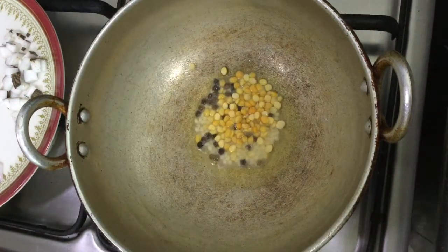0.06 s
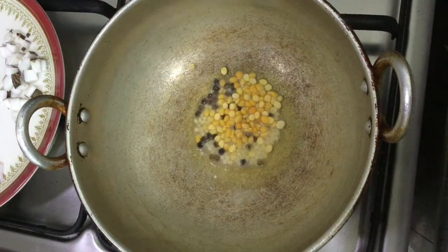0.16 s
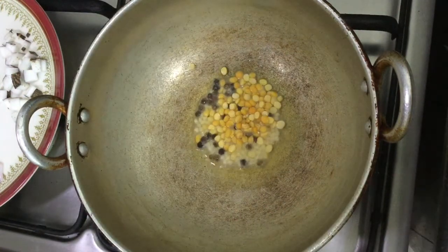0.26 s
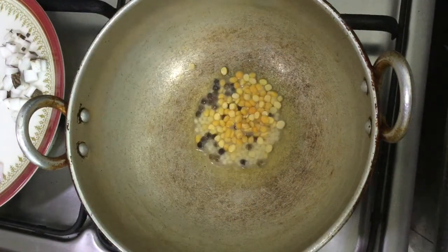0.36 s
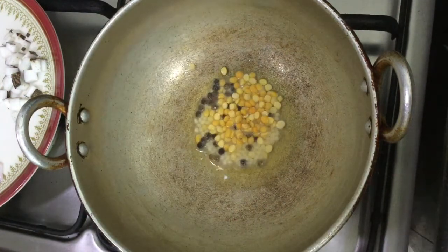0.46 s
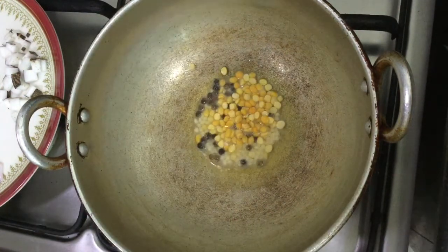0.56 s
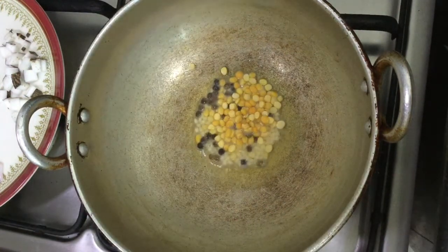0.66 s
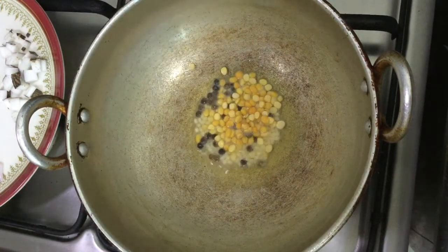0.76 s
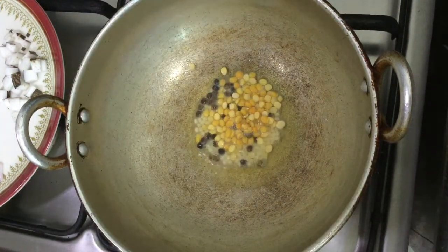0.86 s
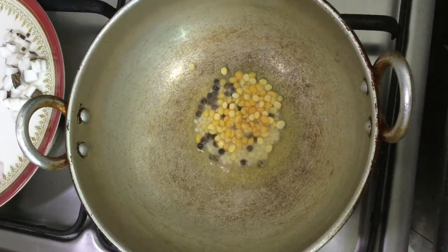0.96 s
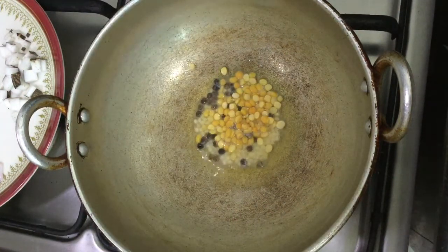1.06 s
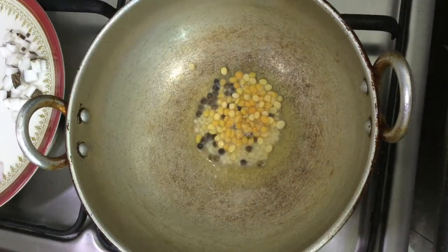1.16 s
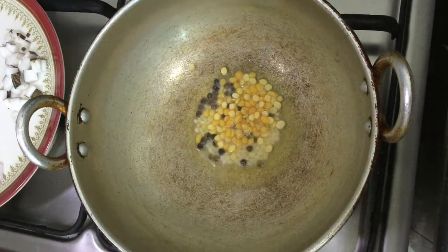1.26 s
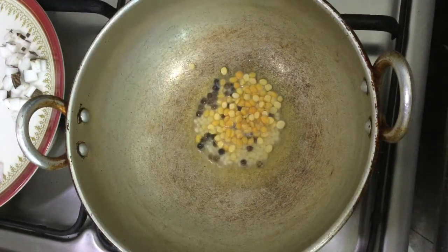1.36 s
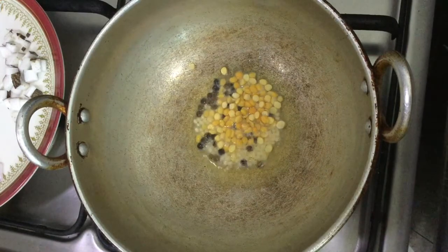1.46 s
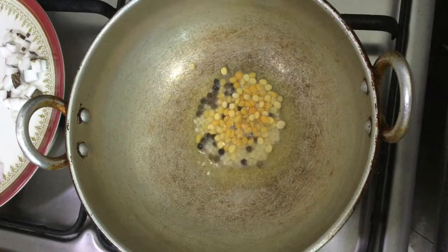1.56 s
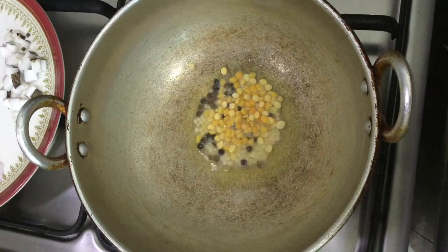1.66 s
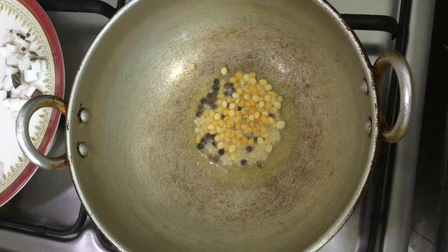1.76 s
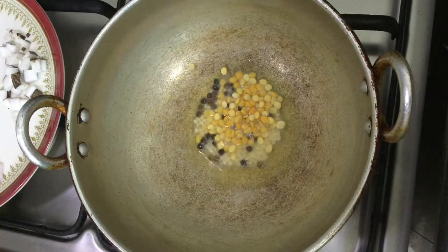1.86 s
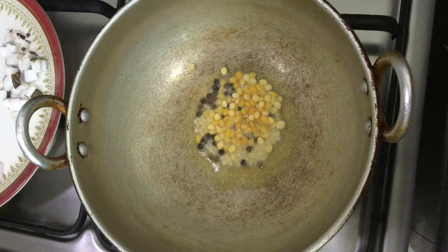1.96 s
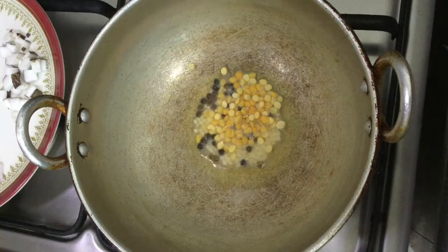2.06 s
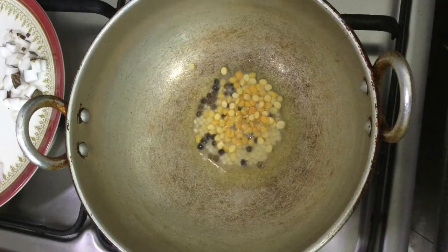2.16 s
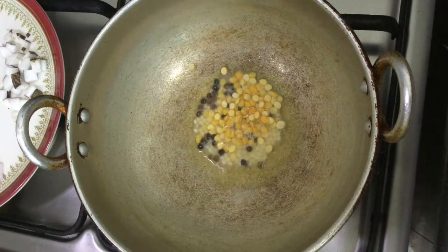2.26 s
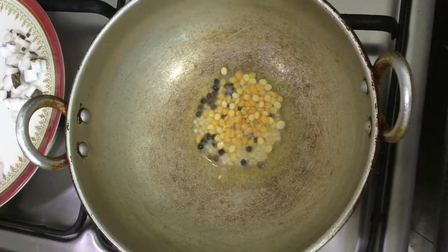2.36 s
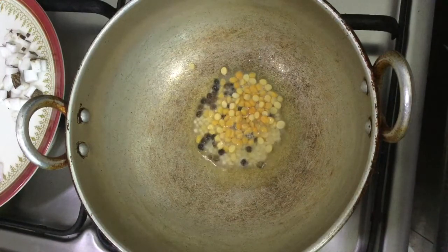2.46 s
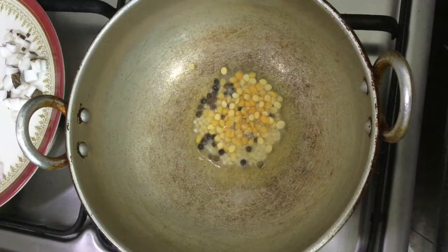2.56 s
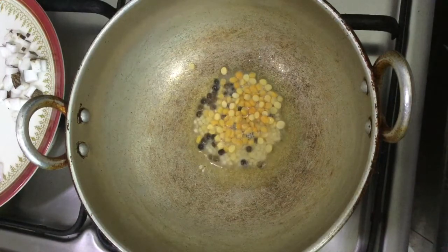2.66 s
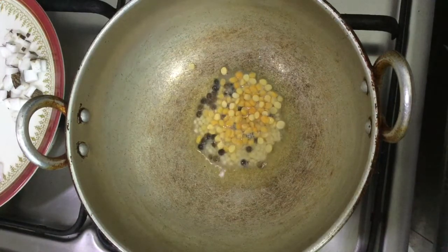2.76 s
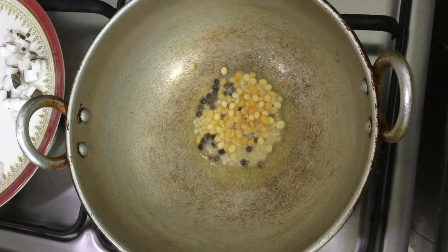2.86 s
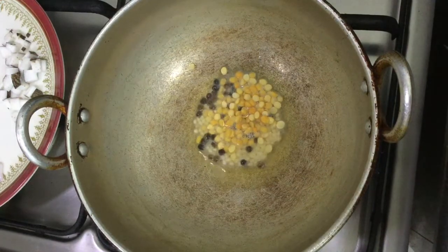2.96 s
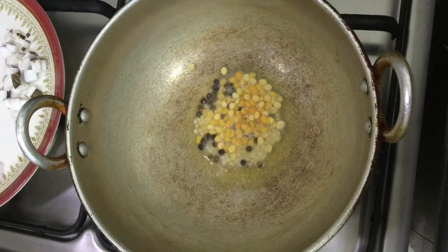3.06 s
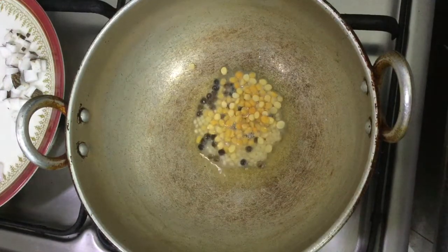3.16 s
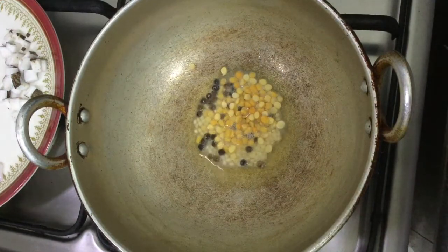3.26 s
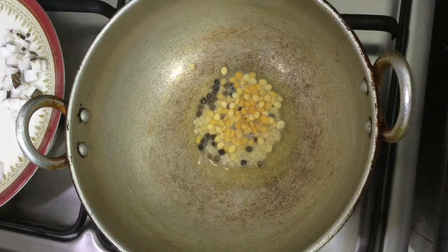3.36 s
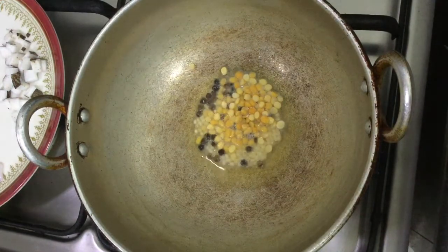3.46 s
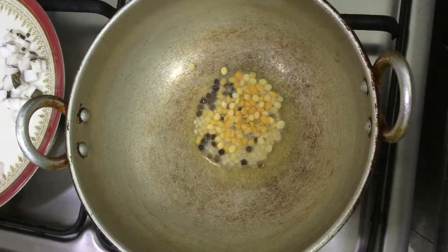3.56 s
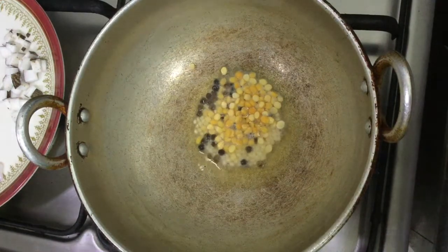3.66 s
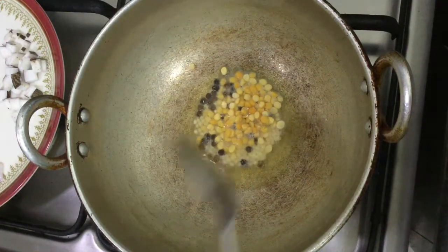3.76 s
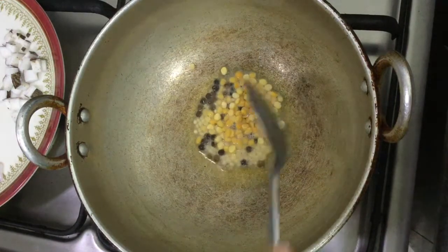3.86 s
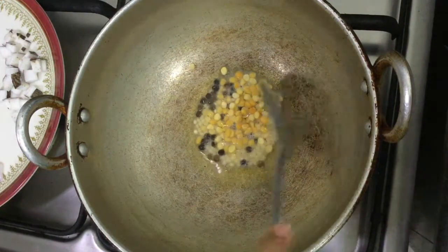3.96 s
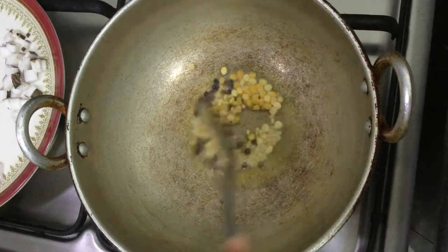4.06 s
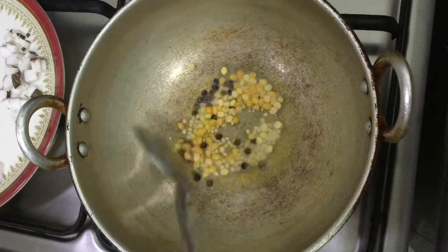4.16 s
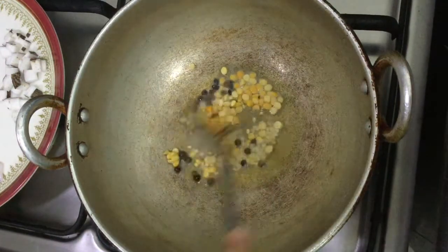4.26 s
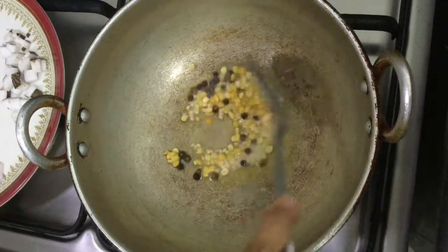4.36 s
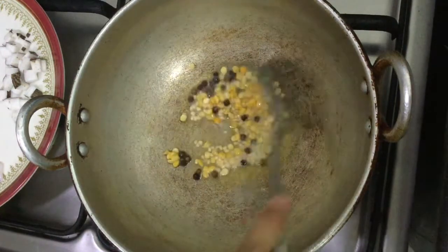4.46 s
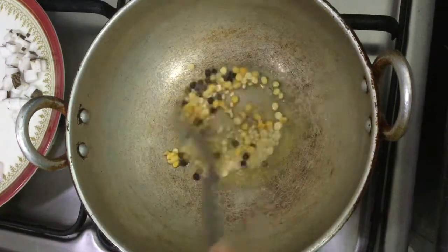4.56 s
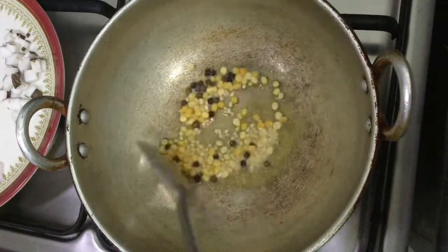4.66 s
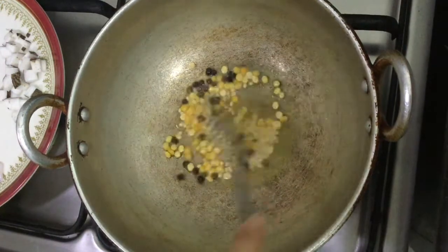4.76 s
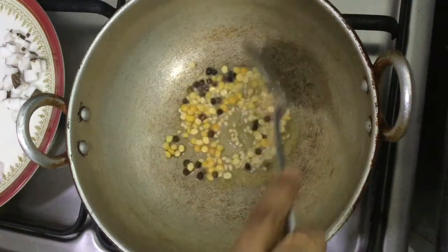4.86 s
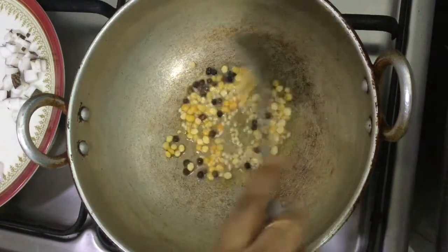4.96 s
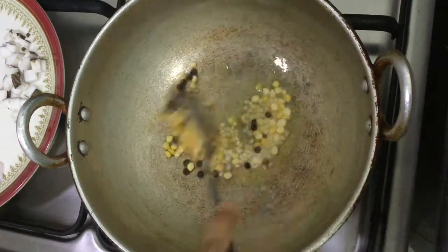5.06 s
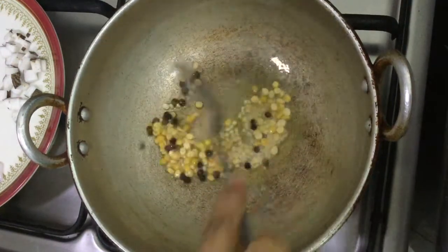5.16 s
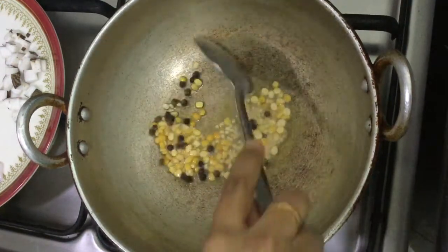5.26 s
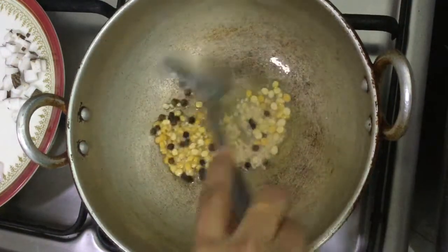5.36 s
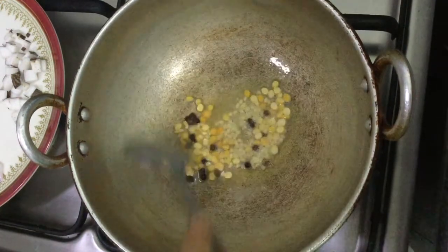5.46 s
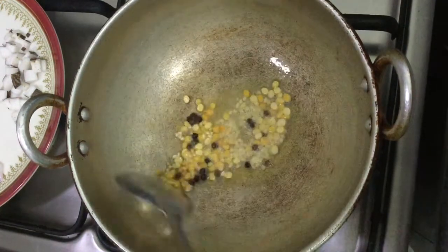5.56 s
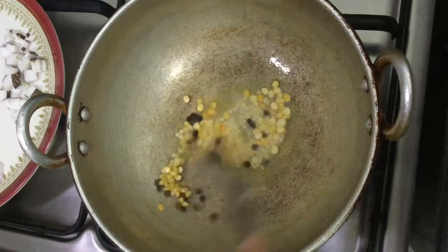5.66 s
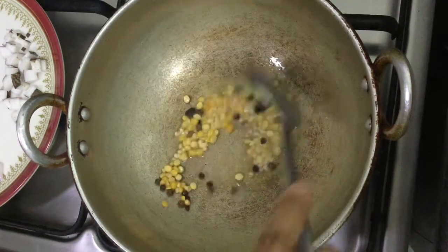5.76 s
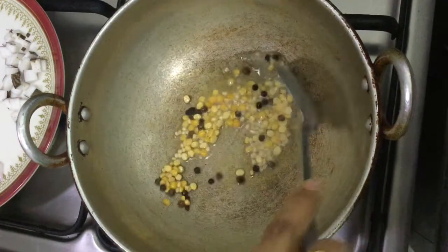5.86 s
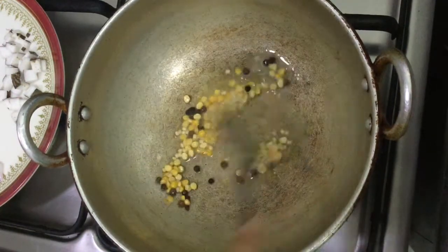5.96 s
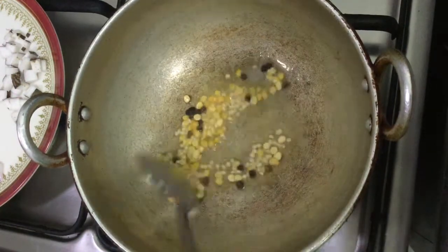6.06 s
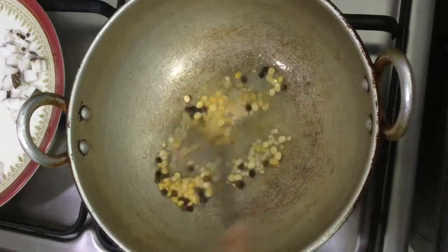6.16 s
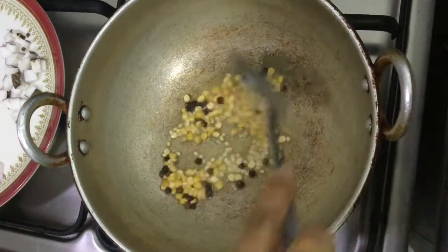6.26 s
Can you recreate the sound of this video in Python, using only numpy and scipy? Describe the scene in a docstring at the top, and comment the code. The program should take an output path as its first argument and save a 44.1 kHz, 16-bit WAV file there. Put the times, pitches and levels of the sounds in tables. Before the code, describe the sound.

Hot oil fizzes and pops with lentils in a metal pan, then a steel spoon rings and stirs with knocks, scrapes and rising sizzle.

```python
"""Hot oil fizzes and crackles over a low rumble and hum, with loud pops and squeaks of steam.
Lentils and peppercorns are frying in a thin metal pan on a stove, close to the microphone.
A steel spoon is picked up with a ringing slide, then stirs: it knocks and scrapes the pan,
the lentils rattle and the turned oil sizzles up. Fizz, sizzle, steam and scrapes are shaped noise and
clicks; metal is a set of dying tones; pops and bumps are short pings."""
import sys
import numpy as np
from scipy import signal
from scipy.fft import rfft, irfft
from scipy.io import wavfile

SR = 44100
rng = np.random.default_rng(int(sys.argv[2]) if len(sys.argv) > 2 else 0)


def log_audio(samples):
    """Write samples as a 16-bit WAV file to the path given in sys.argv[1]."""
    # one column per channel
    frames = np.atleast_2d(samples).T
    # limit to full scale, then quantise
    limited = np.clip(frames, -1, 1)
    pcm = np.round(limited * 32767).astype(np.int16)
    wavfile.write(sys.argv[1], SR, pcm)


N = 277830
TIME = np.arange(N) / SR  # seconds
EDGE_HZ = 15900  # top of the audible band


def gain_of(db):
    """Turns decibels into an amplitude."""
    return 10 ** (np.asarray(db) / 20)


def evened(x):
    """Scales a sound to rms 1."""
    return x / np.sqrt(np.mean(x ** 2) + 1e-20)


def read(points, hz):
    """Reads a table of values by frequency, with straight lines between points on a log-frequency axis."""
    f, value = np.transpose(points)
    return np.interp(np.log(hz + 1), np.log(f + 1), value)


def level(rows):
    """Turns a dB curve over time into a gain, silent before its first row."""
    return gain_of(np.interp(TIME, *np.transpose(rows), left=-200))


def add(mix, s, sound):
    """Mixes a sound in at time s."""
    part = mix[max(round(s * SR), 0):][:len(sound)]
    part += sound[:len(part)]


def coloured(x, points):
    """Filters x with a spectrum and scales it to rms 1."""
    hz = np.fft.rfftfreq(len(x), 1 / SR)
    return evened(irfft(rfft(x) * gain_of(read(points, hz)), len(x)))


def wander(rate_hz):
    """Random drift of rms 1, slow because noise above rate_hz is filtered away."""
    hz = np.fft.rfftfreq(N, 1 / SR)
    slow = rfft(rng.standard_normal(N)) / (1 + (hz / rate_hz) ** 4)
    return evened(irfft(slow, N))


def clicks(per_s, spread_db):
    """Single-sample clicks at random times: many small, a few large."""
    size = gain_of(spread_db * np.minimum(rng.exponential(1, N), 3.5))
    sign = rng.choice([-1, 1], N)
    return size * sign * (rng.random(N) < per_s / SR)


def ring(modes, damping):
    """Struck metal sounds as a sum of tones (modes), each dying at its own rate."""
    t = TIME[:SR // 2]
    total = np.zeros(len(t))
    for hz, db, t60 in modes:
        fade = gain_of(db - 60 * damping * t / t60)
        total += fade * np.sin(2 * np.pi * (hz * t + rng.random()))
    return total


def ping(hz, cycles, glide, size=SR // 40):
    """A few dying cycles whose pitch glides away from hz by the fraction glide."""
    age = TIME[:size] * hz / cycles
    turns = cycles * (age + glide * (age - 1 + np.exp(-age)))
    return (1 - np.exp(-6 * age)) * np.exp(-age) * np.sin(2 * np.pi * turns)


def grains(low_hz, high_hz, per_s, spread_db, cycles, count=40):
    """A crowd of tiny pings of many pitches, set off by random clicks."""
    out = np.zeros(N)
    for hz in np.geomspace(low_hz, high_hz, count):
        grain = evened(ping(hz, cycles * rng.uniform(.5, 2), 0.0068))
        out += signal.oaconvolve(clicks(per_s / count, spread_db), grain)[:N] * np.sqrt(hz)
    return evened(out)


def gesture(start, rise, length, fall_db_per_s):
    """Rises, holds to the end of its length, then dies away."""
    age = TIME - start
    return np.clip(age / rise, 0, 1) * gain_of(-fall_db_per_s * np.maximum(age - length, 0))


# The pan's wall throws the crackle back. Each row: delay in ms, gain.
WALL = [(1.599, -0.075), (2.7, 0.013)]


def walled(x):
    """Quick echoes inside the pan make the crackle a little hollow."""
    echoes = sum(gain * np.interp(TIME - ms / 1000, TIME, x) for ms, gain in WALL)
    return evened(x + echoes)


# How long the room echo lasts. Each row: frequency in Hz, time in seconds to fall by 60 dB.
KITCHEN = [(200, 0.53), (1000, 0.22), (5000, 0.21), (15000, 0.16)]


def kitchen(x):
    """Dense reflections of a small room, made of fading noise; the treble dies first."""
    hz, t, z = signal.stft(rng.standard_normal(SR // 2), SR, nperseg=256)
    fade = gain_of(-60 * t / read(KITCHEN, hz)[:, None])
    tail = signal.istft(z * fade, SR, nperseg=256)[1]
    tail[:SR // 250] = 0  # no reflection in the first 4 ms
    return signal.oaconvolve(x, tail / np.linalg.norm(tail))[:N]


# Spectrum of the steady oil fizz and kitchen background. Each row: frequency in Hz, level in dB per Hz.
FIZZ_SPECTRUM = [(150, -34), (250, -10), (510, -2), (586, -5.5), (906, -16), (1040, -9), (1350, -13),
                 (2240, -13.5), (2810, -14.5), (3840, -10.5), (5440, -8), (12500, -6), (16000, -5)]
# Spectrum of the low rumble. Each row: frequency in Hz, level in dB per Hz.
RUMBLE_SPECTRUM = [(20, -42), (33, -33), (45, -2), (62, -10.5), (85, 7), (105, -6), (125, -5), (180, -4),
                   (225, -13), (270, -19), (400, -19), (700, -129)]
# Soft low bumps. Each row: start in seconds, level in dB, pitch in Hz.
BUMPS = [(1.203, -35.5, 88), (2.099, -32.5, 77.4), (2.174, -40, 70), (2.456, -34, 80), (3.865, -32, 76.5),
         (4.682, -33, 74.4), (4.749, -29, 80.6), (5.902, -43, 75.5)]
# A motor hum swells and sinks. Each row: time in seconds, middle level in dB of the 98 Hz tone.
HUM = [(0, -69), (.65, -55), (1.2, -55), (2.05, -46.5), (3.05, -54.5), (3.32, -84), (3.8, -48.5),
       (4.6, -43), (5.2, -45.5), (5.7, -62), (6.3, -52)]
FIZZ_DB, RUMBLE_DB = -49.5, -54  # the rumble wavers around its level


def background():
    """Even fizz of hot oil with fine crackle, over a lumpy stove and kitchen rumble and a beating hum."""
    crackle = grains(1350, 14400, per_s=300, spread_db=3.5, cycles=3)
    hiss = rng.standard_normal(N)
    fizz = walled(coloured(hiss + gain_of(-6.0) * crackle, FIZZ_SPECTRUM))
    rumble = gain_of(RUMBLE_DB + 2 * wander(17)) * coloured(rng.standard_normal(N), RUMBLE_SPECTRUM)
    for s, db, hz in BUMPS:
        add(rumble, s, gain_of(db) * ping(hz, 1.5, -0.012, size=SR // 8))
    # drifting phases keep the three tones slightly unsteady
    hum = level(HUM) * gain_of(1.5 * wander(7)) * np.sin(2 * np.pi * 98 * TIME + 0.4 * wander(2.5))
    beat = np.cos(np.pi * (TIME - 1.45) / 1.13)  # two motors turn at nearly the same speed
    hum += gain_of(-54.0) * beat * np.sin(2 * np.pi * 196.3 * TIME + 0.22 * wander(1.6))
    hum += gain_of(-67.5) * np.sin(2 * np.pi * 497 * TIME + 0.24 * wander(9.3))
    return gain_of(FIZZ_DB) * fizz + rumble + np.sqrt(2) * hum


# Steam squeezes out of the lentils. Each row: time of the height in seconds, level in dB,
# half length in seconds.
SQUEAKS = [(.01, -51, 0.087), (0.692, -42.5, 0.046), (1.05, -46.5, 0.02), (1.459, -33, 0.023),
           (1.53, -39.5, 0.095), (3.144, -32.5, 0.028), (3.51, -52.5, 0.08), (3.98, -40.5, 0.075),
           (4.344, -37.5, 0.038), (4.686, -43, 0.023), (5.052, -40, 0.017), (5.19, -29.5, 0.023),
           (5.33, -42, 0.033)]
# Resonances of the steam. Each row: pitch in Hz, half width in Hz, level in dB.
WHISTLE = [(3320, 70, -25), (5490, 110, -19), (6310, 70, -19), (8890, 150, -8), (10200, 130, -15),
           (13000, 160, 0), (14750, 190, -5)]


def steam():
    """Each jet of steam swells and fades: noise singing in narrow, fuzzy resonances."""
    f = np.fft.rfftfreq(N, 1 / SR)
    shape = sum(gain_of(db) / (1 + ((f - hz) / width) ** 2) for hz, width, db in WHISTLE)
    jet = evened(irfft(rfft(rng.standard_normal(N)) * shape, N))
    flow = sum(gain_of(db) * np.exp(-((TIME - s) / half) ** 2) for s, db, half in SQUEAKS)
    flutter = gain_of(0.1 + 3.1 * wander(55))
    return flutter * flow * jet


# Strokes of the spoon through the lentils. Each row: start in seconds, length in seconds,
# scraping in dB, sizzle of the turned oil in dB, rumble of the pan in dB.
STROKES = [(3.96, 0.062, -49.5, -38.5, -52.5), (4.1, 0.052, -70, -43.5, -60),
           (4.207, 0.067, -50, -34.5, -58), (4.44, 0.12, -45.5, -36, -47.5),
           (4.688, 0.036, -36, -32.5, -40), (4.942, 0.069, -35.5, -32, -51.5), (5.16, 0.013, -60, -37, -72),
           (5.283, 0.055, -35, -44, -44.5), (5.354, 0.088, -27.5, -31, -69), (5.513, 0.021, -55, -33, -71),
           (5.608, 0.049, -37.5, -53, -45.5), (5.851, 0.067, -31.5, -33, -45.5),
           (5.98, 0.038, -51, -32, -66), (6.132, 0.056, -33.5, -34.5, -54)]
STROKE_RISE_S = 0.0083


def strokes(fall_db_per_s, column):
    """The strokes as one envelope, each at the level in the given column (counted from 0)."""
    return sum(gain_of(row[column]) * gesture(row[0], STROKE_RISE_S, row[1], fall_db_per_s)
               for row in STROKES)


# The oil sizzles more as it spreads over the hot metal. Each row: time in seconds, level in dB.
SPREAD = [(3.75, -63), (4.15, -52), (4.6, -48.5), (4.8, -37.5), (5.25, -37), (5.6, -32), (6.3, -31.5)]
SIZZLE_FALL_DB_PER_S = 150


def frying():
    """Strength of the sizzle: it grows as the oil spreads and surges with each stroke."""
    return np.hypot(level(SPREAD), strokes(SIZZLE_FALL_DB_PER_S, column=3))


def pop(db, hz, cycles):
    """A sharp snap and a short ping, followed by a little spray."""
    t = TIME[:SR // 40]
    snap = np.exp(-t / .0003) + gain_of(-15) * np.exp(-t / .004)  # the slower part is the spray
    colour = [(hz / 4, -22), (hz / 1.8, -8), (hz, 0), (hz * 1.8, -7), (hz * 4, -13)]
    burst = coloured(rng.standard_normal(len(t)), colour)
    return gain_of(db) * (gain_of(1.0) * ping(hz, cycles, 0.024) + gain_of(-3) * snap * burst)


# The loudest bursting oil bubbles and ticking lentils. Each row: start in seconds, level in dB,
# pitch in Hz.
POPS = [(0.064, -37.5, 1590), (0.172, -21, 7650), (0.399, -26.5, 7060), (0.854, -23.5, 11900),
        (0.970, -36, 5330), (1.041, -36.5, 1480), (1.116, -20, 13400), (1.174, -34, 2630),
        (1.399, -27, 4540), (1.591, -30, 1110), (1.813, -23.5, 5960), (1.833, -18, 13100),
        (2.49, -29.5, 3020), (2.585, -23.5, 4850), (2.689, -36.5, 1170), (2.718, -23, 10400),
        (2.739, -22.5, 4780), (2.764, -33.5, 1500), (2.831, -29, 6660), (3.166, -22.5, 6750),
        (3.198, -24.5, 6200), (3.403, -32, 5900), (3.864, -18.5, 13500), (4.165, -19.5, 3440),
        (4.402, -10.5, 9200), (4.907, -5.5, 14000), (5.028, -11, 3770), (5.049, -12, 1680),
        (5.066, -13.5, 3550), (5.102, -12, 12340), (5.162, -14.5, 12300), (5.212, -16, 1410),
        (5.224, -18, 6640), (5.372, -8, 5600), (5.386, -6, 6960), (5.482, -10, 6540), (5.820, -11, 3730),
        (5.992, -16, 3730), (6.016, -15.5, 1720)]
POP_CYCLES, POP_CYCLES_PER_OCTAVE = 2.7, 0.47  # ring length at 5 kHz; higher pops ring for more cycles
SMALL_POPS_PER_S, SMALL_POP_SPREAD_DB = 7, 5  # spread up and down
SMALL_POP_DB, POP_OVER_SIZZLE_DB = -42, 13  # a steady part, and a part that follows the sizzle
SMALL_POP_HZ, SMALL_POP_OCTAVES, SMALL_POP_CYCLES = 6500, 1.32, 0.5  # octaves up and down


def pops():
    """Loud pops of bubbles and lentils among small random ones, which grow with the sizzle."""
    out = np.zeros(N)
    for s, db, hz in POPS:
        cycles = POP_CYCLES + POP_CYCLES_PER_OCTAVE * np.log2(hz / 5000)
        add(out, s, pop(db, hz, cycles))
    strength = gain_of(SMALL_POP_DB) + gain_of(POP_OVER_SIZZLE_DB) * frying()
    for when, size, pitch in rng.random((round(SMALL_POPS_PER_S * N / SR), 3)):
        hz = min(SMALL_POP_HZ * 2 ** (SMALL_POP_OCTAVES * (2 * pitch - 1)), EDGE_HZ)
        small = pop(SMALL_POP_SPREAD_DB * (2 * size - 1), hz, SMALL_POP_CYCLES)
        add(out, when * N / SR, strength[int(when * N)] * small)
    return out


# The spoon is touched, then slides off its rest. Each row: start in seconds, rise in seconds,
# length in seconds, rubbing force in dB.
RUBS = [(2.105, 0.0019, 0.012, -34), (2.19, 0.031, 0.036, -20)]
# Spectrum of the rubbing. Each row: frequency in Hz, level in dB per Hz.
SLIDE_SPECTRUM = [(88, -58), (150, -10), (368, -14.5), (414, -4.5), (578, -20), (689, -41), (979, -28),
                  (1170, 0.5), (1830, -12), (3770, -4), (4240, -10), (5150, -11), (14500, -17.5),
                  (16000, -20)]
# Tones of the free spoon. Each row: pitch in Hz, level in dB, time in seconds to fall by 60 dB.
SPOON = [(417, -12, 0.12), (695.3, 0, 0.3), (1174, -4.5, 0.24), (1280, -13, .1), (1426, -11, 0.28),
         (1750, -26, .12), (2233, -4, 0.12), (2460, -17, 0.16), (3100, -4.5, 0.24), (3690, -10, 0.24),
         (3654, -3, 0.25), (3840, -24, .25), (4140, -5, 0.14), (4430, -9, .22), (4710, -11, 0.24),
         (5050, -5.5, 0.22), (5300, -7, .18), (5960, -10, 0.14), (6285, -17, 0.19), (6514, -11, 0.13),
         (7068, -22, .18), (7531, -7, 0.14)]
RUB_FALL_DB_PER_S = 150


def spoon_lift():
    """The steel spoon chatters along its rest, snaps free and rings on."""
    catches = evened(clicks(per_s=2500, spread_db=1.5))
    chatter = evened(rng.standard_normal(N) + 0.51 * catches)
    force = sum(gain_of(db) * gesture(s, rise, length, RUB_FALL_DB_PER_S) for s, rise, length, db in RUBS)
    rub = force * coloured(chatter, SLIDE_SPECTRUM)
    held = ring(SPOON, damping=1.4)  # dies sooner than the free spoon
    ringing = signal.oaconvolve(force * chatter, held / np.linalg.norm(held))[:N]
    out = gain_of(-1.0) * rub + gain_of(-4) * ringing
    add(out, 2.111, gain_of(-52) * held)
    add(out, 2.246, gain_of(-28) * ring(SPOON, damping=1))  # snaps free
    return out


# Spectrum of the sizzling oil. Each row: frequency in Hz, level in dB per Hz.
SIZZLE_SPECTRUM = [(880, -16), (1500, 0.5), (1640, -1), (2560, -5.5), (3770, -2.5), (6890, 1),
                   (10100, -3.5), (13400, 1.5), (16000, -1.5)]


def sizzle():
    """Stirring turns wet lentils onto hot metal: bubbles, fine snaps and hiss, and the lentils rattle."""
    crackle = grains(2960, 14900, per_s=1400, spread_db=2.0, cycles=5.0)
    snaps = evened(clicks(per_s=900, spread_db=5.2))
    hiss = rng.standard_normal(N)
    oil = coloured(crackle + gain_of(2.5) * snaps + gain_of(-4.5) * hiss, SIZZLE_SPECTRUM)
    rattle = grains(2003, 6450, per_s=450, spread_db=3, cycles=2.5)
    rattle = evened(rattle * gain_of(3.4 * wander(38)))  # the lentils tumble in clumps
    flicker = gain_of(2.0 + 2.36 * wander(62))
    return flicker * frying() * walled(oil + gain_of(-6.0) * rattle)


# The spoon strikes the pan. Each row: time in seconds, level in dB, brightness in dB per octave.
KNOCKS = [(3.965, -23.5, 3.5), (4.216, -25, 2.5), (4.400, -27, -4), (4.448, -31.5, 0.5), (4.654, -25.5, 2),
          (4.682, -24.5, -2.5), (4.911, -9, 2.5), (5.159, -25.5, 1), (5.276, -5.5, 0.5), (5.528, -13, 22),
          (5.621, -20, 4), (5.701, -19.5, 3), (5.846, -7.5, 1.6), (5.858, -13, 6), (6.132, -21.5, -1)]
# Spectrum of the dead part of a blow, before brightness. Each row: frequency in Hz, level in dB per Hz.
THUD_SPECTRUM = [(50, -6), (170, 6), (350, -8), (700, 9), (1500, -11), (2300, -26.5), (3500, -6.5),
                 (7000, -7), (16000, -17)]


def knock(tilt_db, pan):
    """One blow: a dead thud of noise, the ringing pan and a low bonk; soft blows are lower and longer."""
    t = TIME[:len(pan)]
    softness = -min(tilt_db, 0)
    colour = [(hz, db + tilt_db * np.log2(hz / 800)) for hz, db in THUD_SPECTRUM]
    thud = coloured(rng.standard_normal(len(t)), colour)
    contact_s = 0.004 * 2 ** (softness / 4)
    blow = gain_of(-4.0) * thud * np.exp(-t / contact_s) + gain_of(-7.0) * pan / abs(pan).max()
    bonk = ping(660 * 2 ** (-softness / 8), 1.6, -0.019, size=len(t))
    return blow + gain_of(-7.0 - 1.6 * max(tilt_db, 0)) * bonk  # bright blows have less bonk


# Tones of the pan, damped by its stand and the food. Each row: pitch in Hz, level in dB,
# time in seconds to fall by 60 dB.
PAN = [(227.6, -31, 0.35), (435, -31, 0.019), (592, 3, 0.043), (733, 10, 0.031), (837, -5.5, 0.21),
       (1037, -3, 0.026), (1330, -1, 0.086), (1460, -11, 0.22), (1580, 7.5, 0.067), (1716, 3, 0.061),
       (2223, -1, 0.058), (2560, -26, 0.22), (2940, 3.5, 0.081), (3730, -7.5, 0.13), (3620, -19, 0.16),
       (4000, -36, 0.15), (4590, 10, 0.06), (4950, 5, .05), (4685, -0.5, 0.063), (6000, -12.5, 0.3),
       (6980, 6, 0.082), (8050, 0.5, 0.16)]
# Spectrum of the scraping. Each row: frequency in Hz, level in dB per Hz.
SCRAPE_SPECTRUM = [(60, -15), (200, -35), (400, -8), (750, -2), (1100, 9.5), (1600, -6.5), (2300, -1),
                   (4000, -8), (9000, -5)]
# The pan grumbles on its stand under the spoon. Each row: frequency in Hz, level in dB per Hz.
GRUMBLE_SPECTRUM = [(40, -39), (80, -2), (125, -0.5), (175, -3.5), (230, -0.5), (310, -9.5), (500, -11.5),
                    (800, -19), (2000, -55)]
SCRAPE_FALL_DB_PER_S, RUMBLE_FALL_DB_PER_S = 216, 108
DRAG_DB = -15.5  # light scraping between strokes, relative to the SPREAD level


def stirring():
    """The spoon's edge catches on the pan in tiny slips that make it ring, and knocks it now and then."""
    pan = ring(PAN, damping=1.0)
    force = np.hypot(strokes(SCRAPE_FALL_DB_PER_S, column=2), gain_of(DRAG_DB) * level(SPREAD))
    slips = evened(clicks(per_s=1400, spread_db=4)) * force
    rasp = coloured(clicks(per_s=2300, spread_db=1.5), SCRAPE_SPECTRUM) * force
    ringing = signal.oaconvolve(slips, pan / np.linalg.norm(pan))[:N]
    grumble = coloured(rng.standard_normal(N), GRUMBLE_SPECTRUM)
    out = gain_of(-7) * rasp + gain_of(-2.5) * ringing
    out += strokes(RUMBLE_FALL_DB_PER_S, column=4) * grumble
    for s, db, tilt_db in KNOCKS:
        add(out, s + 0.001158, gain_of(db) * knock(tilt_db, pan))  # about 1 ms after the listed time
    return out


def scene():
    """Pan and spoon are heard directly and with a fainter room echo; the background has no added echo."""
    pan = steam() + sizzle() + stirring() + pops()
    spoon = spoon_lift()
    echo = kitchen(gain_of(-10.0) * pan + gain_of(-12.5) * spoon)
    return (pan + spoon + echo + background())[None]


def record(dry):
    """The microphone drops the deepest bass; then a filter removes what lies above the band."""
    bass_cut = signal.butter(5, 40, "high", fs=SR, output="sos")
    lean = signal.sosfilt(bass_cut, dry)
    band_limit = signal.firwin(511, EDGE_HZ, window=("kaiser", 9), fs=SR)
    return signal.oaconvolve(lean, band_limit[None], "same")


dry = scene()
out = record(dry)
log_audio(out)
```